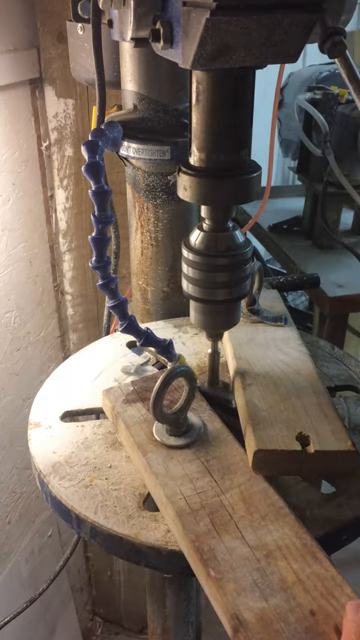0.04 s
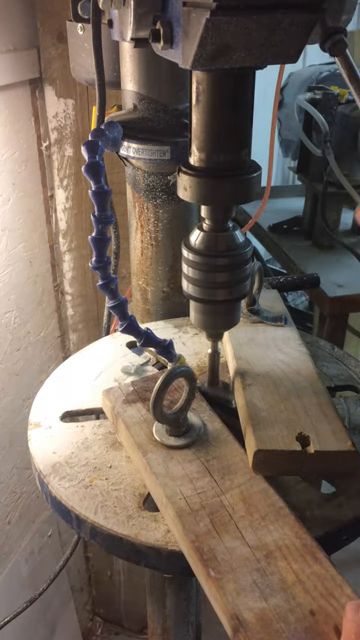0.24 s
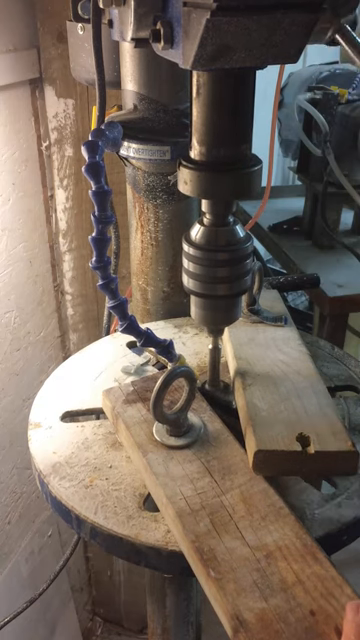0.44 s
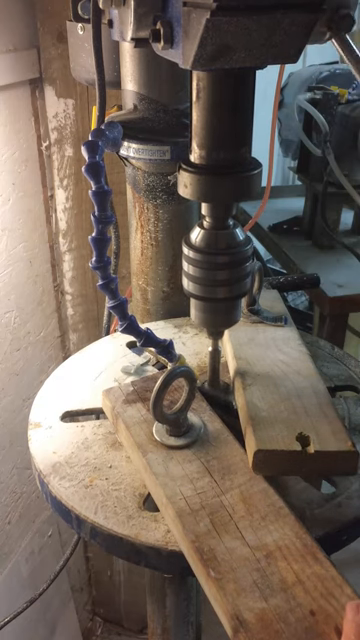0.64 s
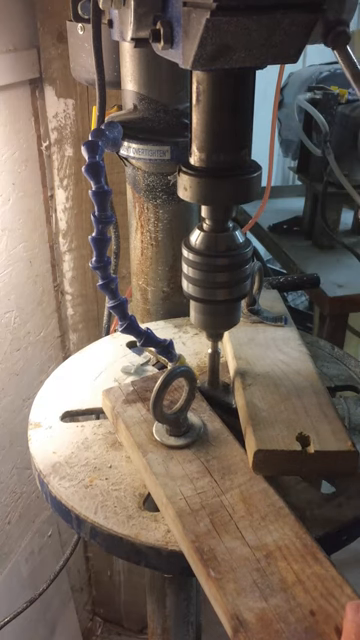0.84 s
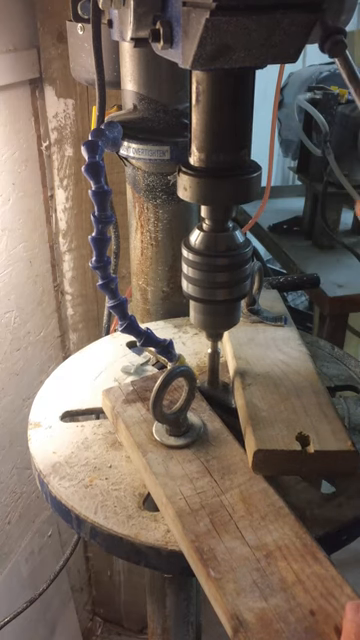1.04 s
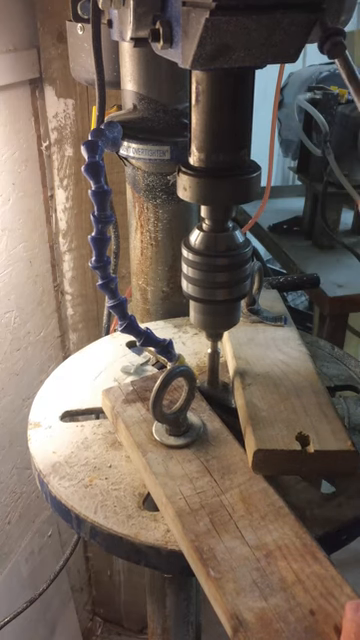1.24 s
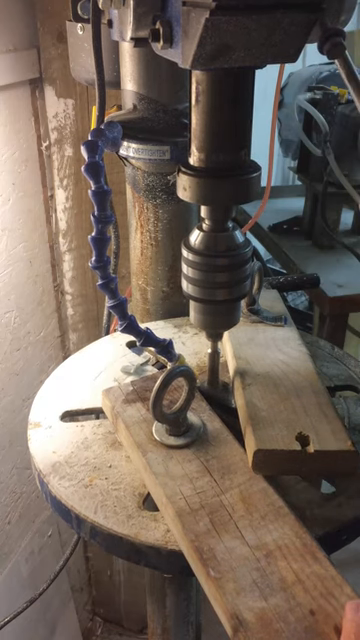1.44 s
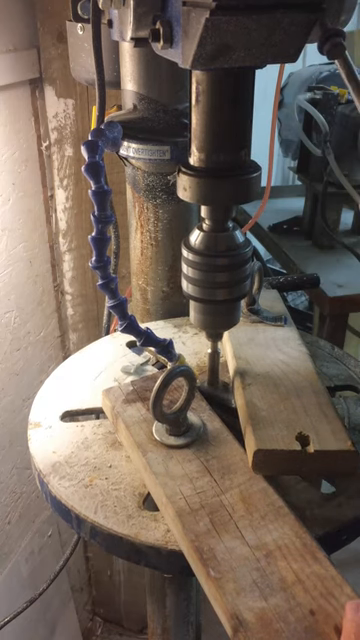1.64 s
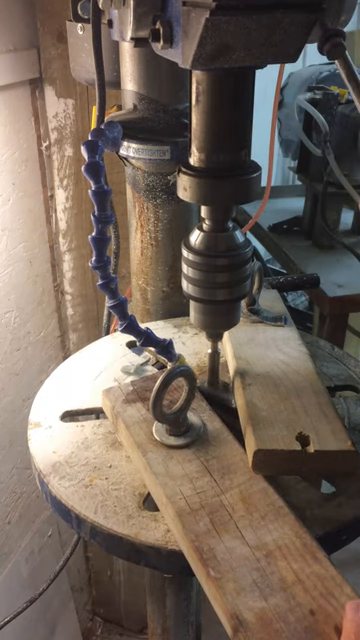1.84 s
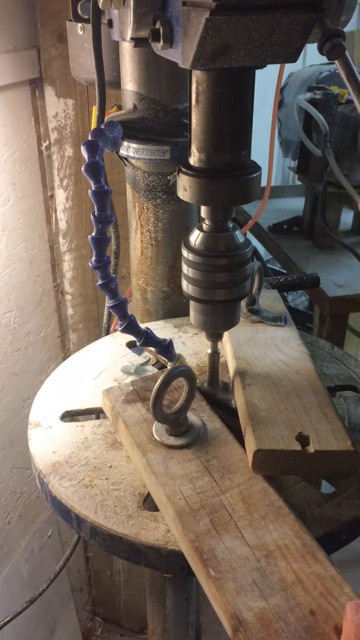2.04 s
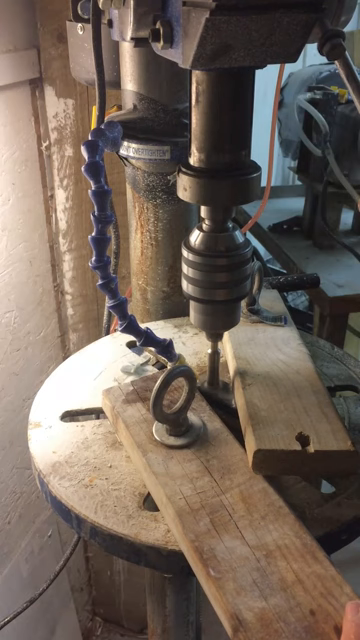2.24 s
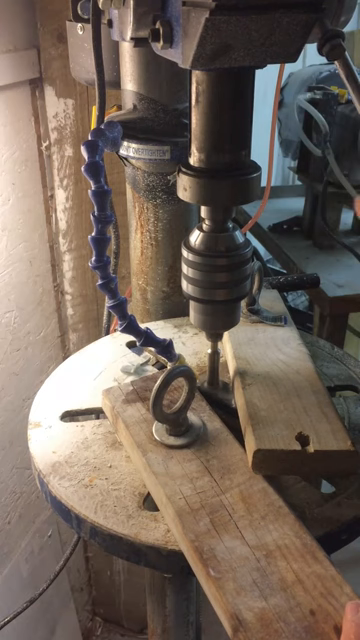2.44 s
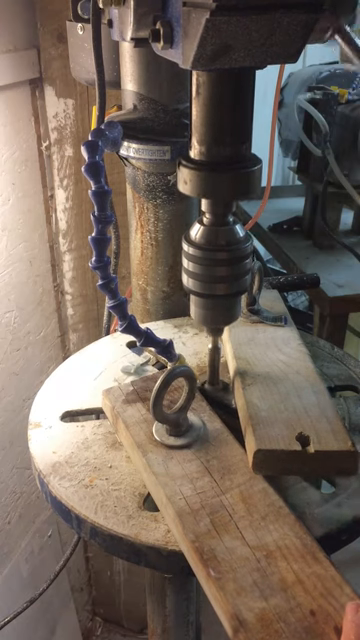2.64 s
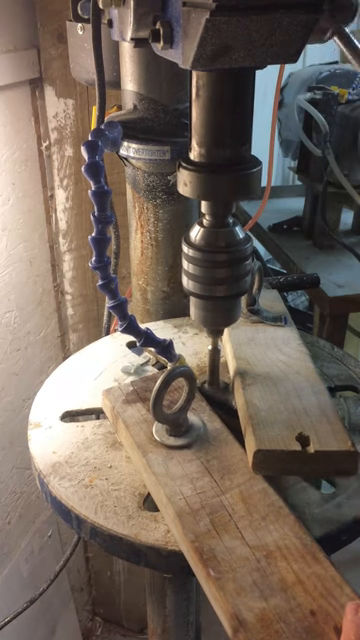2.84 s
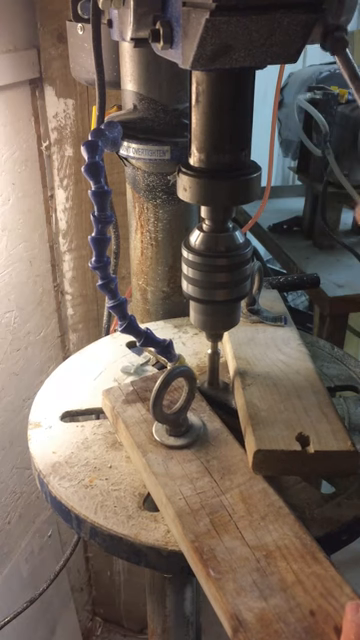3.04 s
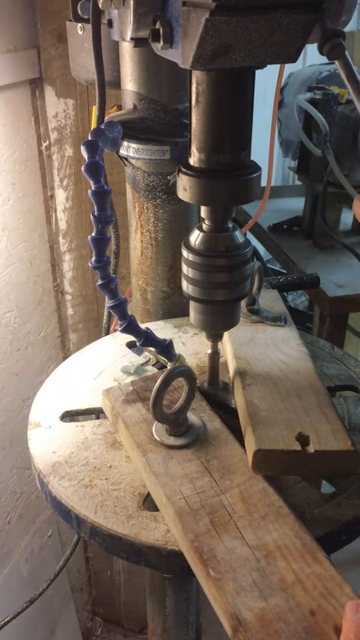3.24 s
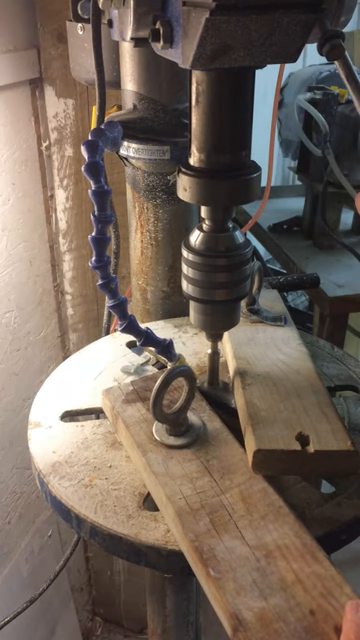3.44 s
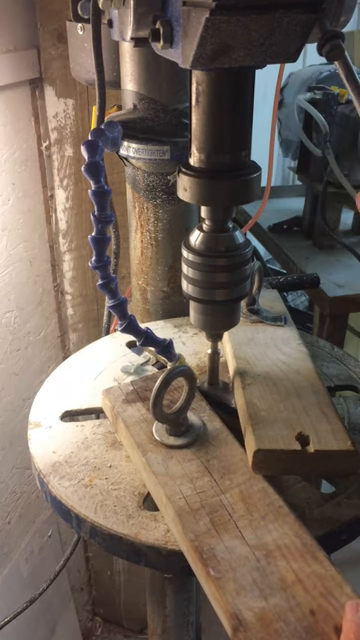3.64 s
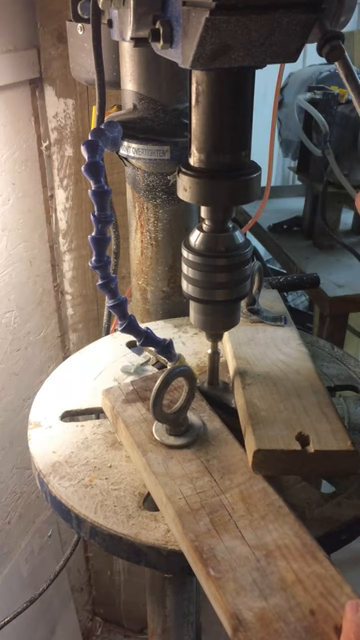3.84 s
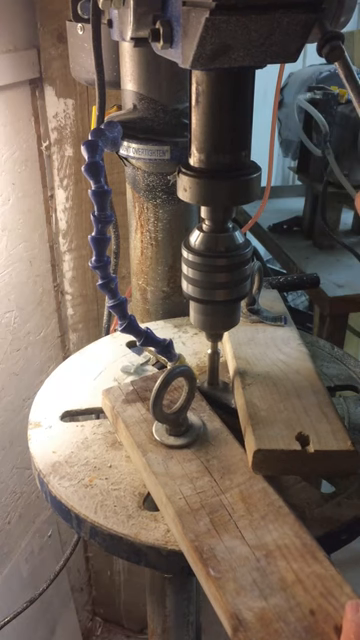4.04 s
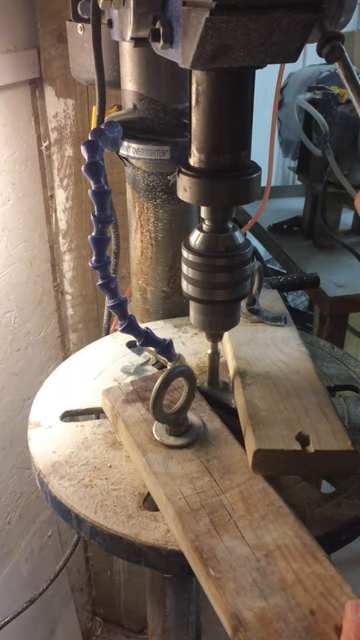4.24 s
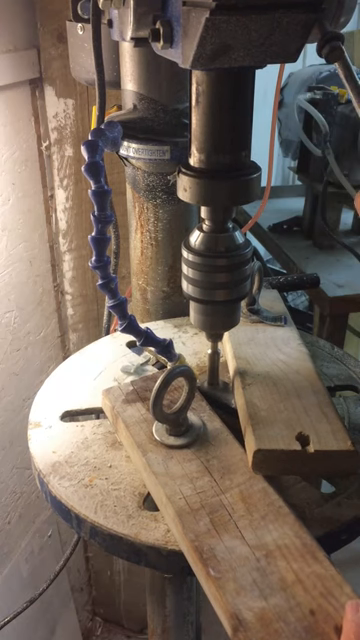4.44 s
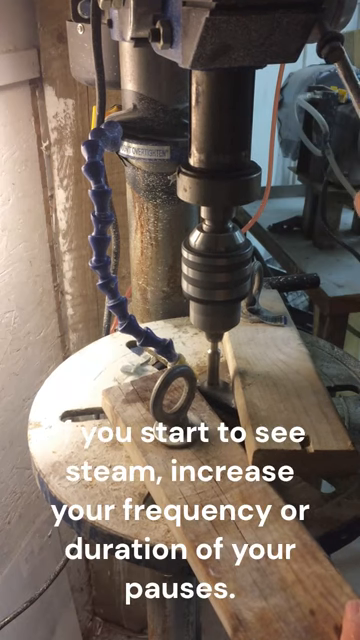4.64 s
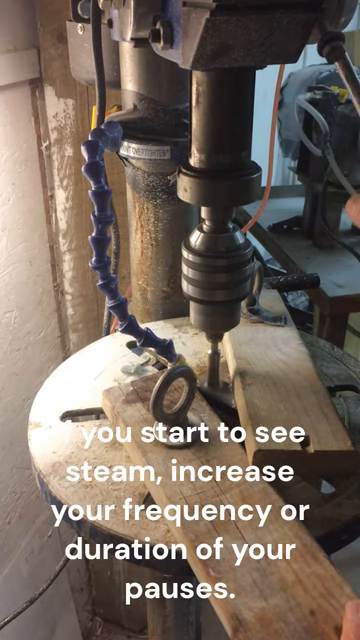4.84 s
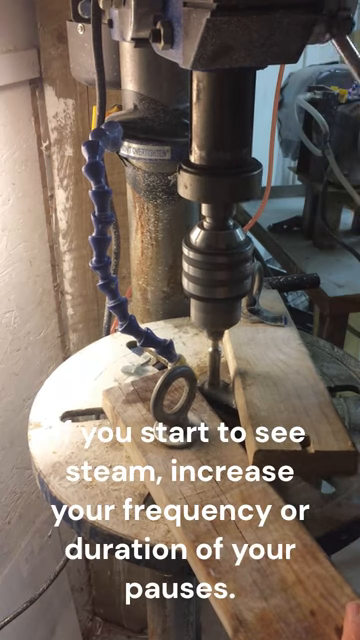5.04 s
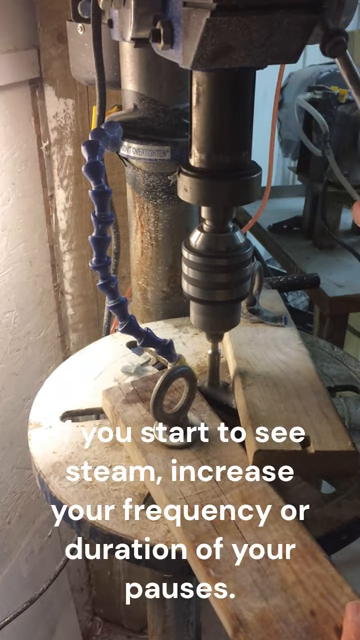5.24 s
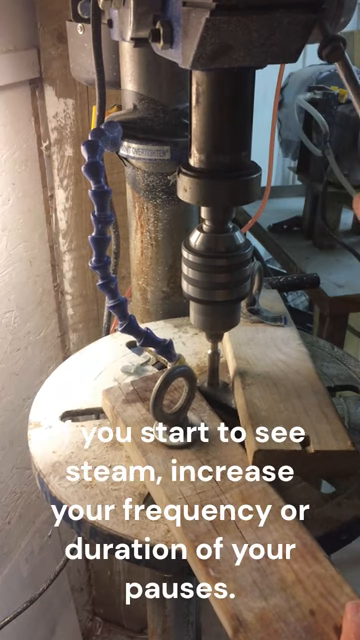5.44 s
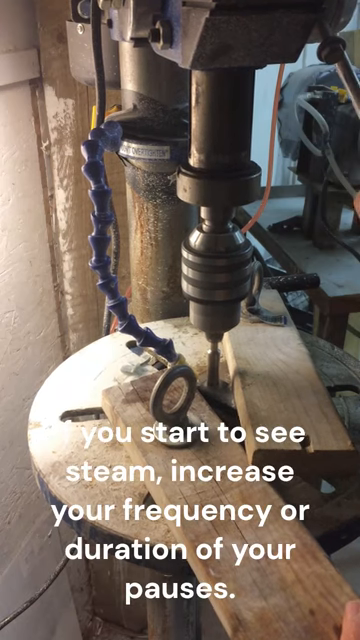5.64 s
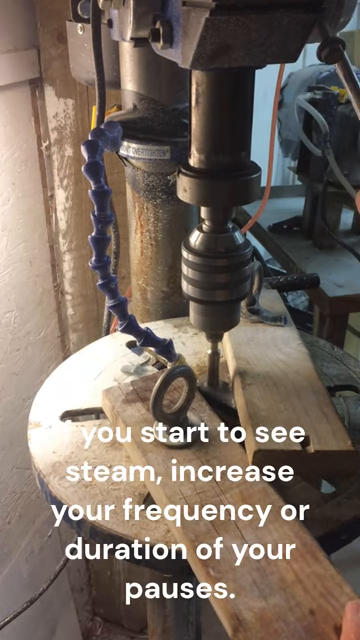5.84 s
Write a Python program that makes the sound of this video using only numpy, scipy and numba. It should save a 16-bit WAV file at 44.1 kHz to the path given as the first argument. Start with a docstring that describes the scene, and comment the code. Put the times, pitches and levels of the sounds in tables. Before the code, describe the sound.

A drill press rumbles steadily while its wet bit pecks into stone, each bite breaking into a piercing, pulsing high squeal between short knocks and scrapes.

```python
"""In a workshop, a drill press pecks a wet diamond core bit into stone, with a phone close by.
The belt-driven head rumbles; the bit knocks the lip of the hole, and rubs its wall as it rises.
Grit grinds and coolant hisses while the bit is in the hole. Under load the thin tube squeals,
its pitch and level nearly repeating with each turn of the uneven rim. Filtered noise makes the rough
sounds, sines the tones; the phone's gain control ducks the whole mix when it gets loud."""
import sys
import numpy as np
from scipy import signal
from scipy.fft import rfft, irfft, next_fast_len
from scipy.io import wavfile
from scipy.ndimage import uniform_filter1d, minimum_filter1d, map_coordinates
from numba import njit

SR = 44100
rng = np.random.default_rng(int(sys.argv[2]) if len(sys.argv) > 2 else 0)


def waveform_to_disk(signal):
    """Save audio, clipped to [-1, 1], as 16-bit WAV at the path in sys.argv[1]."""
    frames = np.transpose(np.atleast_2d(signal))
    scaled = np.clip(frames, -1, 1) * 32767
    samples = np.round(scaled).astype(np.int16)
    wavfile.write(sys.argv[1], SR, samples)


N = 260190


def undb(db):
    """Gain of a level in dB."""
    return 10 ** (np.asarray(db) / 20)


def level(x, db):
    """Scale to an rms level in dB."""
    return x * undb(db) / np.sqrt(np.mean(x ** 2))


def curves(rows):
    """Each column of (start_s, value, ..) rows, interpolated at every sample."""
    s, *columns = np.transpose(rows)
    t = np.arange(N) / SR
    return [np.interp(t, s, column) for column in columns]


def bumps(rows):
    """Sum of bell-shaped (centre_s, size, length_s) moments."""
    t = np.arange(N) / SR
    return sum(size * np.exp(-((t - s) / length) ** 2) for s, size, length in rows)


def walk(rate_hz):
    """Random levels held 1 / rate_hz and smoothed twice; rms 1."""
    hold = int(SR / rate_hz)
    steps = np.repeat(rng.standard_normal(N // hold + 1), hold)
    smooth = uniform_filter1d(uniform_filter1d(steps, hold), hold)
    return level(smooth[:N], 0)


def coloured(x, spectrum, spectrum_db, modes):
    """Filter a broadband sound by a spectrum plus a body's resonances, balanced in dB; rms 1."""
    n = next_fast_len(N)
    f = np.arange(n // 2 + 1) * SR / n + 1  # the 1 Hz keeps the logarithm finite
    points_hz, points_db = np.transpose(spectrum)
    gain = level(undb(np.interp(np.log(f), np.log(points_hz), points_db)), spectrum_db)
    for hz, width_hz, db in modes:
        peak = 1j * f * width_hz / (hz ** 2 - f ** 2 + 1j * f * width_hz)
        gain = gain + peak * undb(db) / np.sqrt(np.mean(np.abs(peak) ** 2))
    return level(irfft(rfft(x, n) * gain, n)[:N], 0)


@njit
def band(x, hz, width):
    """State-variable band-pass whose centre may move every sample."""
    y, b, l = np.empty(len(x)), 0., 0.
    for i in range(len(x)):
        g, k = np.tan(np.pi * hz[i] / SR), width / hz[i]
        v = (b + g * (x[i] - l)) / (1 + g * (g + k))
        b, l, y[i] = 2 * v - b, l + 2 * g * v, k * v
    return y


@njit
def slew(target, start, fall, rise):
    """Follow a target at one pace downwards and another upwards."""
    y, g = np.empty(len(target)), start
    for i in range(len(target)):
        g += (target[i] - g) * (fall if target[i] < g else rise)
        y[i] = g
    return y


def waver(x, depth, rate_hz):
    """Vary the playback speed by a small share, so all resonances drift together."""
    drift = np.cumsum(depth * walk(rate_hz))
    return map_coordinates(x, [np.arange(N) + drift], mode="mirror")


# rumble spectrum of the head: pitch_hz [Hz], level_db [dB per Hz, relative]
HEAD_SPECTRUM = [(15, -57), (25, -23), (179, -9), (266, -1), (357, -6.5), (425, -2.5), (614, -11.5),
                 (1110, -14.5), (2380, -18), (3050, -24.5), (4740, -35.5), (5370, -51.5), (9000, -41),
                 (11700, -71), (19800, -120)]
# casting, table and belt guard resonances: pitch_hz [Hz], width_hz [Hz], level_db [dB, relative]
FRAME_MODES = [(123, 19, -11), (223, 10, -8.5), (267, 9.9, -3), (338, 47, -12), (420, 19, -9.5),
               (516, 20, -10), (747, 67, -12), (1033, 73, -11.5)]
# the feed lever jolts the quill and the head gets louder: centre_s [s], rise_db [dB], length_s [s]
JOLTS = [(.72, 4.5, 0.043), (.815, 4.5, 0.022), (2.46, 1.5, 0.035), (2.89, 6.5, 0.05), (3.22, 1.5, 0.12),
         (5.18, 4, .06), (5.45, 3.5, 0.063)]
HEAD_DB, BELT_HZ, MOTOR_HZ = -30, 9.15, 27.8
HUM_HZ, HUM_DB, HUM_FLUTTER_DB = 270, -12, 1.5  # the casting's tone; HUM_DB is relative to the rumble


def head():
    """Bearings and belt shake the casting; the rumble throbs with belt and motor, over a hum."""
    t = np.arange(N) / SR
    motor_db = 1.0 * np.sin(2 * np.pi * MOTOR_HZ * t)
    belt_db = 0.51 * np.sin(2 * np.pi * 2 * BELT_HZ * t)  # twice per belt turn
    throb_db = motor_db + belt_db + 1.37 * walk(22.0)
    rumble = coloured(rng.standard_normal(N) * undb(throb_db), HEAD_SPECTRUM, 4.1, FRAME_MODES)
    hum_phase = 2 * np.pi * np.cumsum(HUM_HZ + 2.5 * walk(8)) / SR
    hum = level(np.sin(hum_phase), HUM_DB) * undb(HUM_FLUTTER_DB * walk(10))
    return (rumble + hum) * undb(HEAD_DB + bumps(JOLTS) + 0.61 * walk(4.05))


# the spinning bit knocks and scrapes the lip of the hole: start_s [s], scrape_db [dB],
# decay_s [s to -60 dB, at least 0.03], near_hz [Hz, modes around this pitch ring], ring_db [dB]
KNOCKS = [(.5576, -31, .2, 1160, -34), (.649, -27, .06, 2900, -33), (.6755, -23, .14, 2080, -25),
          (.804, -15, .14, 2080, -31), (.866, -14, 0.15, 2080, -21.5), (.8894, -13, 0.02, 3270, -16),
          (.9094, -26, .06, 5960, -23), (.9844, -29, .03, 3500, -22), (1.0094, -26, .05, 3100, -24),
          (1.0398, -26, 0.2, 2420, -25), (2.7237, -29, .08, 2420, -38), (2.8331, -28, 0.06, 3270, -30),
          (2.891, -23, .09, 2820, -28), (2.942, -23, .08, 2420, -28), (2.96, -27.5, 0.17, 1740, -25),
          (3.0205, -21, 0.47, 2080, -21.5), (3.0494, -30, .08, 2970, -26), (3.075, -33, 0.1, 3470, -28),
          (3.1194, -29, 0.6, 2420, -25), (4.955, -29, .5, 2900, -32), (5.1758, -24, .3, 2080, -26),
          (5.2094, -27, .03, 3020, -25), (5.2244, -27, .03, 2950, -18), (5.243, -17, 0.15, 2420, -18),
          (5.2744, -26, 0.2, 4790, -26), (5.3194, -25, 0.3, 5960, -26), (5.3494, -20, .07, 3470, -24)]
# scrape spectrum at the lip: pitch_hz [Hz], level_db [dB per Hz, relative]
LIP_SPECTRUM = [(300, -18), (800, -11), (2000, 0), (3500, 0), (5500, -7), (10000, -17)]
# resonances of the bit: pitch_hz [Hz], width_hz [Hz], level_db [dB, relative, in the scrape]
BIT_MODES = [(1040, 52, -5), (1740, 38, -19.5), (2080, 26, -9.5), (2420, 63, -11), (2960, 180, -7.5),
             (3270, 90, -16), (3510, 97, -14.5), (4790, 40, -11.5), (5960, 70, -15)]


def knocks():
    """Each knock is a scraping burst; the modes nearest the point of contact ring out clearly."""
    since = np.arange(SR // 2) / SR
    rise = 1 - np.exp(-since / 0.0009)
    fade, ring = np.zeros((2, N + len(since)))
    for s, scrape_db, decay_s, near_hz, ring_db in KNOCKS:
        at = slice(int(s * SR), int(s * SR) + len(since))
        fade[at] += undb(scrape_db) * np.exp(-np.log(1000) * since / max(decay_s, .03)) * rise
        for hz, width_hz, _ in BIT_MODES:
            share = np.exp(-(np.log(hz / near_hz) / 0.062) ** 2)
            if share > .05:
                mode = np.exp(-np.pi * width_hz * since) * np.sin(2 * np.pi * hz * since)
                ring[at] += share * undb(ring_db) * rise * mode
    noise = coloured(rng.standard_normal(N), LIP_SPECTRUM, 0, BIT_MODES)
    scrape = undb(-7.5 + 2.8 * walk(150)) * fade[:N] * noise
    return scrape + ring[:N] * undb(1.3 * walk(200))


# the rising bit rubs the wall of the hole, one list per rub:
# start_s [s], resonance_hz [Hz], level_db [dB, of the narrow band]
RUBS = [
    [(.54, 1020, -36), (.578, 1040, -37), (.638, 830, -40), (.672, 1040, -36), (.722, 814, -33),
     (.758, 917, -42), (.79, 814, -40)],
    [(2.635, 1160, -46), (2.644, 1160, -29), (2.662, 1050, -36), (2.686, 930, -30), (2.706, 950, -38),
     (2.732, 900, -31), (2.762, 830, -42), (2.8, 900, -46)],
    [(4.93, 958, -46), (4.954, 945, -38), (5.004, 772, -46), (5.02, 768, -44), (5.07, 958, -46),
     (5.15, 745, -43)],
]
RUB_WASH_DB = -6.5  # wide band relative to the narrow one


def rub():
    """A gritty rub in a resonance that moves as the bit rises, with a wider wash above it."""
    rows = []
    for points in RUBS:
        first, last = points[0], points[-1]
        rows.append((first[0] - .02, first[1], -90))
        rows += list(points)
        rows.append((last[0] + .02, last[1], -90))
    hz, db = curves(rows)
    grains = rng.standard_normal(N) * undb(3.5 * np.minimum(rng.exponential(size=N), 4))
    narrow = level(band(grains, hz, 190.), 0)
    wash_hz = 1.7 * hz
    wash = level(band(band(grains, wash_hz, 1300.), wash_hz, 1300.), RUB_WASH_DB)
    return (narrow + wash) * undb(db + 1.8 * walk(90))


# the pecks, one row each: enter_s, scrape_s (the wall), slide_s (free), touch_s (the bottom), bite_s,
# release_s, leave_s [all s], turn_s [s, the rim's pattern starts a turn],
# squeal_db, rasp_db, down_db (grinding on the way down) [dB, added to the stage levels]
PECKS = [(-.5, -.42, -.25, -0.17, .03, .235, 0.41, .035, -1, 5.5, -2),
         (.8, 0.875, .99, 1.095, 1.305, 2.55, 2.678, 1.396, 1, 0, 0.5),
         (3.02, 3.101, 3.13, 3.185, 3.355, 4.84, 5.0, 3.417, 1.5, -3, -1.5),
         (5.152, 5.192, 5.345, 5.428, 5.59, 6.6, 6.73, 5.47, -1.5, -3, 1)]
# names of the first seven columns of PECKS
MOMENTS = ["enter", "scrape", "slide", "touch", "bite", "release", "leave"]
# every peck passes the same stages: moment [name], after_s [s], squeal_db, rasp_db, grinding_db,
# coolant_hiss_db, spindle_load_db [all dB]
STAGES = [("enter", -.012, -80, -80, -50.5, -57, -60), ("enter", 0.013, -80, -80, -44, -61, -56),
          ("scrape", -0.021, -80, -80, -39.5, -52, -53), ("scrape", 0, -80, -80, -31, -46, -46),
          ("slide", 0, -70, -69, -31.5, -44, -37), ("touch", -.02, -60, -50, -35.5, -40, -38),
          ("touch", 0, -36, -27, -36.5, -31, -39), ("touch", .06, -40, -34, -38, -33, -39),
          ("bite", -0.015, -31, -27.5, -39, -32.5, -37.5), ("bite", 0.0076, -7, -16.5, -39, -33.5, -38.5),
          ("bite", 0.13, -7.5, -26, -36.5, -42, -35.5), ("halfway", 0, -7.5, -24.5, -34.5, -52, -32),
          ("release", -0.03, -9, -20.5, -35, -40.5, -33.5), ("release", 0, -10, -20, -36.5, -30, -34),
          ("release", 0.039, -22, -29.5, -35.5, -32.5, -36.5),
          ("leave", -0.017, -65, -54.5, -34.5, -48, -41.5), ("leave", 0.014, -80, -80, -51.5, -51, -52),
          ("raised", 0, -80, -80, -61, -62, -62)]


def stages():
    """Squeal, rasp, grinding, hiss and load levels laid out at the moments of each peck."""
    rows = []
    next_enters = [peck[0] for peck in PECKS[1:]] + [7.]
    for (*times, _, squeal_db, rasp_db, down_db), next_s in zip(PECKS, next_enters):
        at = dict(zip(MOMENTS, times))
        at["halfway"] = (at["bite"] + at["release"]) / 2
        at["raised"] = (at["leave"] + next_s) / 2
        for moment, after_s, squeal, rasp, grind, *rest in STAGES:
            grind = grind + down_db * (moment in ("scrape", "slide"))
            rows.append((at[moment] + after_s, squeal + squeal_db, rasp + rasp_db, grind, *rest))
    return curves(sorted(rows))


FIZZ_HZ, FIZZ_WIDTH_HZ, FIZZ_DB = 11000., 3500., -12  # FIZZ_DB is relative to the grinding


def fizz(grind_db, squeal_db):
    """Bright fizz, a band of noise, follows the grinding and fades as the squeal grows louder."""
    centre = np.full(N, FIZZ_HZ)
    noise = band(band(rng.standard_normal(N), centre, FIZZ_WIDTH_HZ), centre, FIZZ_WIDTH_HZ)
    fade_db = 1.5 * np.maximum(squeal_db + 32, 0)
    return level(noise, FIZZ_DB) * undb(grind_db - fade_db + 2.0 * walk(40))


# grinding, coolant and spray spectra: pitch_hz [Hz], level_db [dB per Hz, relative]
GRIT_SPECTRUM = [(710, -33.5), (1200, -4.5), (1550, -13.5), (2480, -1.5), (2840, -1), (3080, -2.5),
                 (6110, -1.5), (9000, -14.5), (11700, -46.5), (19800, -120)]
HISS_SPECTRUM = [(4000, -29), (5500, -11.5), (7000, -5.5), (8300, 8.5), (9600, -12.5), (10800, -19.5),
                 (13000, -8.5), (16000, -33.5)]
SPRAY_SPECTRUM = [(9500, -41.5), (11200, -19), (12800, -2.5), (14200, 5.5), (16000, 0.5)]
# chuck, bit and clamp rung by the grit: pitch_hz [Hz], width_hz [Hz], level_db [dB, relative]
CHUCK_MODES = [(1800, 31, -22), (2455, 160, -15.5), (4630, 10, -25.5), (4850, 27, -15.5), (5760, 48, -16),
               (7530, 68, -15.5)]
# loaded spindle and column: pitch_hz [Hz], width_hz [Hz], level_db [dB, relative]
WHINE_MODES = [(273.3, 11, -2), (2190, 28, -7), (3010, 100, -4.5), (6250, 75, -4)]
WHINE_DRIFT, WHINE_FLUTTER_DB, SPRAY_FLUTTER_DB = .003, 1.3, .8  # drift is a share of pitch


def grinding(grind_db, hiss_db, load_db):
    """Diamond grains scratch the stone in uneven clicks that ring the chuck; coolant hisses at the rim."""
    grains = rng.standard_normal((4, N)) * undb(2.3 * np.minimum(rng.exponential(size=(4, N)), 6))
    flicker_db = 1.02 * walk(35)
    grit = waver(coloured(grains[0], GRIT_SPECTRUM, 0, CHUCK_MODES), .006, 20)
    grit = grit * undb(grind_db + flicker_db + 1.2 * walk(140) + .8 * walk(45))
    hiss = coloured(grains[1], HISS_SPECTRUM, 0, [])
    hiss = hiss * undb(hiss_db + flicker_db + 2.0 * walk(40))
    # load on the bit raises the spindle's whine and the fine spray thrown off the rim together
    whine = waver(coloured(grains[2], GRIT_SPECTRUM, -29, WHINE_MODES), WHINE_DRIFT, 12)
    whine = whine * undb(WHINE_FLUTTER_DB * walk(25) - 2)
    spray = coloured(grains[3], SPRAY_SPECTRUM, 0, []) * undb(0.5 + SPRAY_FLUTTER_DB * walk(60))
    return grit + hiss + (whine + spray) * undb(load_db)


# gaps and high spots of the rim: position [share of turn], shift [share of turn, at seating 1],
# width [share of turn], light_db, deep_db [dB, lightly and deeply seated],
# light_hz, deep_hz [Hz, pitch shift lightly and deeply seated]
RIM_SPOTS = [(.01, -.01, 0.031, -19, -20.5, 0, 0), (0.081, 0.004, .16, 0, 0, -75, -245),
             (.15, -0.0048, .07, 8.5, 8, -30, -60), (.27, -0.0087, .05, 2, 1, 90, 70),
             (.375, -.04, .045, -11, -13, 20, -110), (.5, 0.0, .1, -2, 1.5, 0, 0),
             (.68, .02, 0.039, -2.5, -1.5, 0, 0), (.76, 0.0052, .06, -0.5, 1.5, 40, 35),
             (.87, -0.0041, .09, 7.5, 5.5, -25, 0)]
# the trailing high spot (last of the rim) grips differently over time: start_s [s], level_db [dB]
GRIP = [(1.9, -1.5), (2.1, -4), (2.27, -1.5), (2.37, 1), (4.2, 0), (4.8, -3)]
RIM_DB = -2.5  # level between the spots
UNEVEN_SHARE, UNEVEN_DB, UNEVEN_HZ = .009, 1.4, 24  # spread of each pass: share of turn, dB, Hz


def rim(turns, seat):
    """Level and pitch shift as each spot of the rim passes; no two passes of a spot are alike."""
    db, hz = RIM_DB, 0
    chance = rng.standard_normal((len(RIM_SPOTS), 3, 128))
    last = len(RIM_SPOTS) - 1
    grip_db = np.outer(np.arange(len(RIM_SPOTS)) == last, curves(GRIP)[0])
    for spot, draws, extra_db in zip(RIM_SPOTS, chance, grip_db):
        position, shift, width, light_db, deep_db, light_hz, deep_hz = spot
        from_spot = turns - position - shift * seat
        nearest = np.round(from_spot)
        late, louder, higher = draws[:, nearest.astype(int) % 128]
        near = np.exp(-((from_spot - nearest - UNEVEN_SHARE * late) / width) ** 2)
        db = db + (light_db + seat * (deep_db - light_db) + extra_db + UNEVEN_DB * louder) * near
        hz = hz + (light_hz + seat * (deep_hz - light_hz) + UNEVEN_HZ * higher) * near
    return db, hz


# feed pressure pulls the tube's pitch down and seats the rim, one list per peck:
# start_s [s], pitch_hz [Hz, before the rim bends it], seating [0 light, 1 deep]
FEED = [
    [(0, 8420, 0), (.14, 8357, 0.09), (.23, 8400, 0.02), (.27, 8530, 0.03)],
    [(1.28, 8530, 0), (1.31, 8385, 0.04), (1.42, 8310, .06), (1.6, 8250, .1), (2.2, 8296, .29),
     (2.4, 8210, .47), (2.5, 8140, 0.69), (2.55, 8340, 0.11), (2.59, 8670, 0.02)],
    [(3.34, 8630, 0.01), (3.36, 8550, 0.06), (3.5, 8400, 0.06), (3.6, 8310, 0.45), (3.8, 8234, .93),
     (4.5, 8232, 1.1), (4.78, 8217, 1.04), (4.84, 8250, 0.4), (4.88, 8490, 0)],
    [(5.44, 8660, 0), (5.585, 8790, 0), (5.6, 8430, 0), (5.66, 8366, 0), (5.9, 8277, .3)],
]
# the rim snags and drags the pitch down: centre_s [s], drop_hz [Hz], length_s [s]
SNAGS = [(4.728, 597, 0.00604), (4.815, 199, 0.01015)]
# the squeal catches and drops out, mostly before the rim is seated: centre_s [s], depth_db [dB]
DROPOUTS = [(.005, 14), (.033, 17), (.077, 33), (0.105, 21), (0.137, 19), (0.163, 18), (0.208, 16),
            (1.303, 10), (1.327, 15.5), (1.36, 17.5), (1.377, 10), (1.398, 10), (1.408, 5.5), (1.429, 12.5),
            (2.012, 12), (2.174, 10), (2.462, 7), (3.373, 23), (3.402, 25.5), (3.4185, 30), (3.447, 18),
            (3.459, 14), (4.048, 5), (4.122, 5), (4.268, 5), (5.594, 8), (5.622, 10), (5.632, 24),
            (5.664, 14)]
SPINDLE_HZ, DROPOUT_S = 13.75, 0.0052
LIGHT_FEED_HZ, LOUDER_DB_PER_HZ = 8377, .025  # louder as the pitch sinks below this, softer above


def squeal(clean_db, rasp_db):
    """The tube sings on one mode; the rim's shape bends pitch and level once a turn."""
    t = np.arange(N) / SR
    hz, seat = curves(sum(FEED, []))
    clean_db = clean_db + LOUDER_DB_PER_HZ * (LIGHT_FEED_HZ - hz)
    enter, *_, turn_s, _, _, _ = np.transpose(PECKS)
    peck = np.searchsorted(enter, t) - 1
    turns = (t - turn_s[peck]) * SPINDLE_HZ + 30 * peck  # whole turns, for fresh draws in each peck
    spot_db, spot_hz = rim(turns, seat)
    bend_hz = spot_hz - bumps(SNAGS)
    hz = hz + bend_hz + 12 * walk(50)
    settled = np.clip(seat / 0.085, 0, 1)  # the rim's level pattern only shows once it has found its seat
    rim_db = settled * spot_db - bumps([(s, depth_db, DROPOUT_S) for s, depth_db in DROPOUTS])

    phase = 2 * np.pi * np.cumsum(hz) / SR
    tone = np.sqrt(2) * (np.sin(phase) + undb(-27.0) * np.sin(2 * phase))
    tone = tone * undb(clean_db + rim_db + 0.72 * walk(50))

    noise = rng.standard_normal((2, N))
    core = level(band(band(noise[0], hz, 160.0), hz, 160.0), -2.8)
    skirt = level(band(band(noise[0], hz - 200, 510.0), hz - 200, 440.0), -13.0)
    rasp = (core + skirt) * undb(rasp_db + 0.83 * rim_db)

    # hard drag, heard as low pitch, also stirs a lower mode of the tube
    lower_hz = np.full(N, 7580.)
    drag = level(band(band(noise[1], lower_hz, 350.), lower_hz, 350.), 0)
    drag = drag * undb(clean_db - 37 - 0.055 * np.maximum(bend_hz, -260) + 3.4 * walk(30))

    direct = tone + rasp + drag
    # table top and wall return it a little later: delay s, dB
    echoes = [(.0043, -21), (.0117, -15.5), (.023, -15.5)]
    return direct + sum(undb(db) * np.roll(direct, int(s * SR)) for s, db in echoes)


def scene():
    """Everything reaches one microphone."""
    squeal_db, rasp_db, grind_db, hiss_db, load_db = stages()
    background = head() + knocks() + rub()
    cutting = fizz(grind_db, squeal_db) + grinding(grind_db, hiss_db, load_db)
    return (background + cutting + squeal(squeal_db, rasp_db))[None]


TOP_HZ = 15800  # low-pass cutoff: nothing is heard above this pitch


def record(dry):
    """Gain control ducks what exceeds a threshold and recovers slowly; peaks are limited, the top is cut."""
    loud_db = 10 * np.log10(uniform_filter1d(dry[0] ** 2, 3000) + 1e-12)
    threshold_db, slope, first_db, fall_s, rise_s = -24, 0.5225, -5.5, 0.095, 0.22
    target_db = -slope * np.maximum(loud_db - threshold_db, 0)
    gain_db = slew(target_db, first_db, 1 / (fall_s * SR), 1 / (rise_s * SR))
    ducked = dry * undb(gain_db)
    held = -minimum_filter1d(-np.abs(ducked), 44)  # largest sample within 1 ms
    peak = uniform_filter1d(held, 44) / .8 + 1e-9
    limited = ducked * np.tanh(peak) / peak
    low_pass = signal.ellip(16, .3, 90, TOP_HZ, fs=SR, output="sos")
    return signal.sosfilt(low_pass, limited)


dry = scene()
out = record(dry)
waveform_to_disk(out)
```